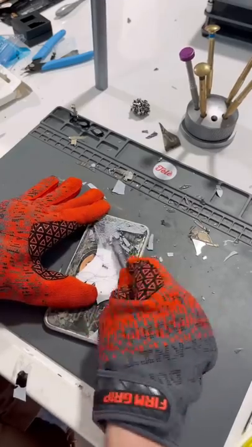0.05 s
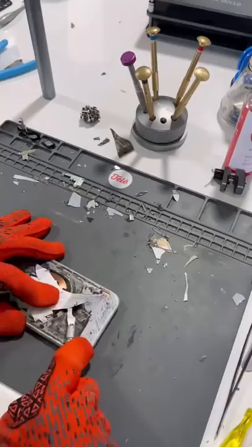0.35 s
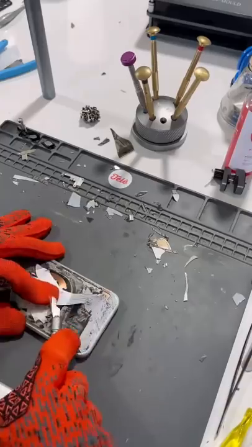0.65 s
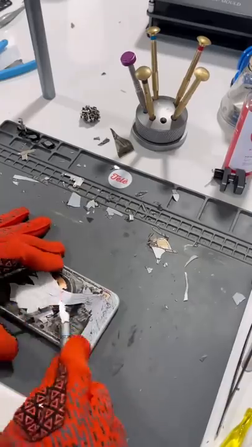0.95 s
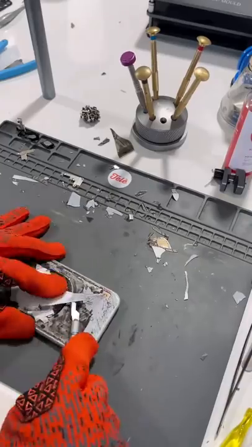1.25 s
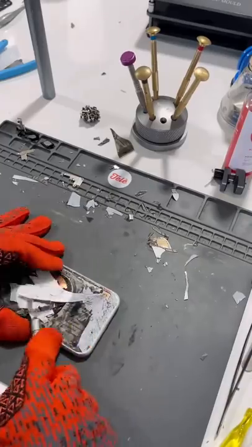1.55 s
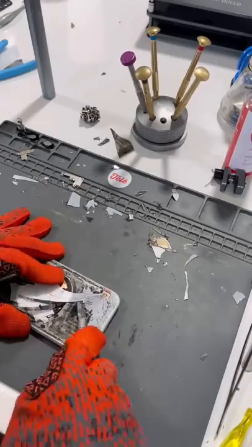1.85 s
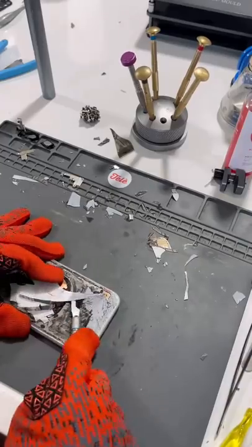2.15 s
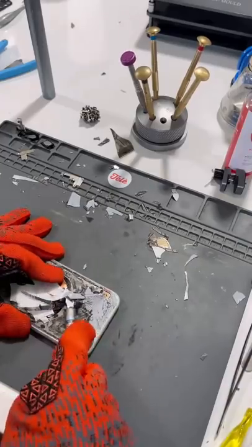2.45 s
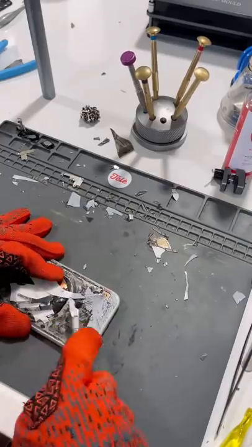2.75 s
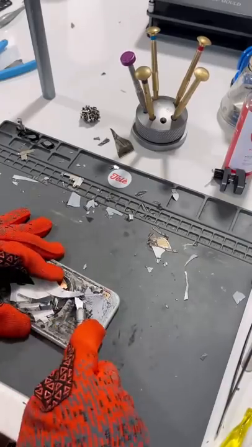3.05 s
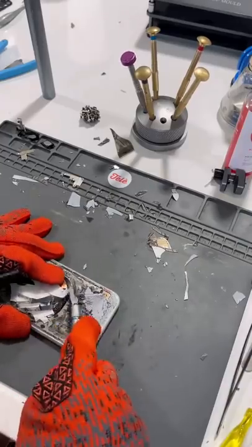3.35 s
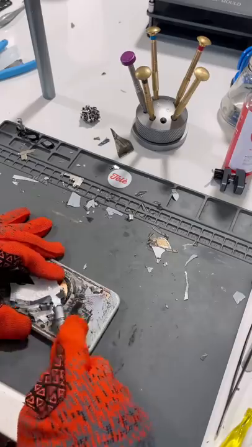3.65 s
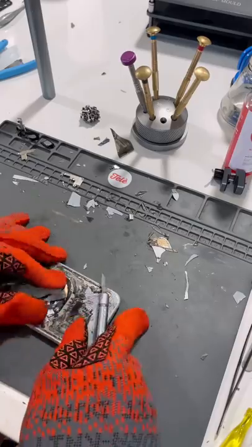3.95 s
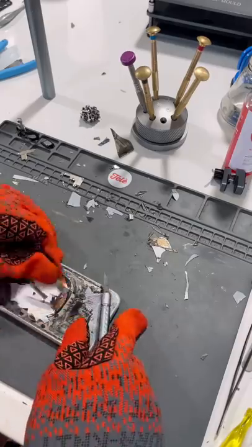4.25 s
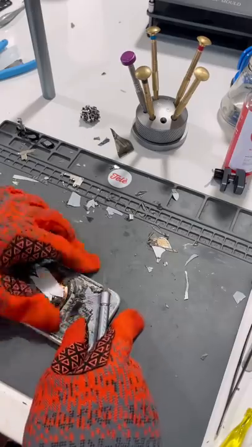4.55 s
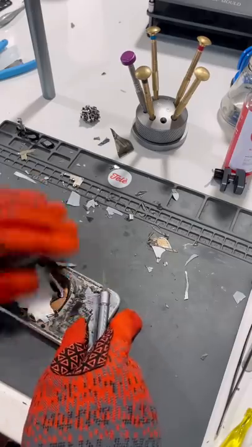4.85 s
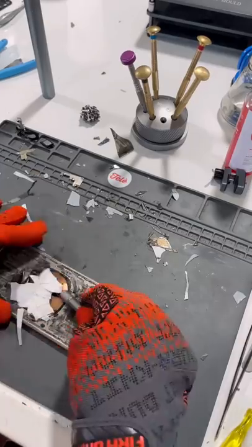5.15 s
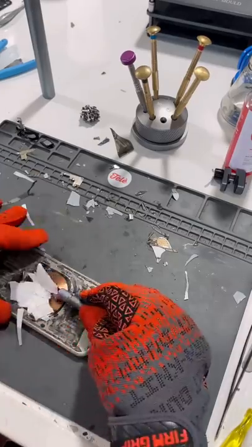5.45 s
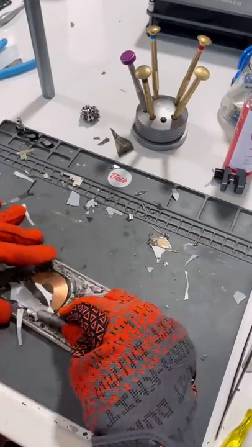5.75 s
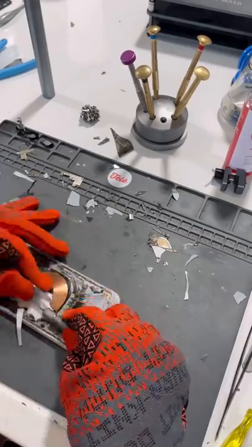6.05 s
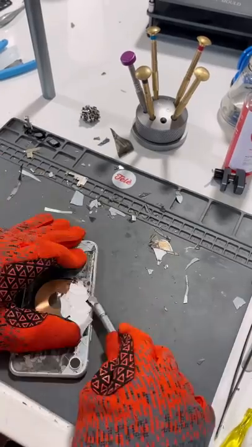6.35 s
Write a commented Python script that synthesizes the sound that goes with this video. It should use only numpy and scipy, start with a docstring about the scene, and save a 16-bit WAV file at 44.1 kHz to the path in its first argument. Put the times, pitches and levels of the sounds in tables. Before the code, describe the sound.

A metal pick chips and scrapes shattered glass off a phone, with sharp irregular snaps, gritty crackling and light knocks over a faint hum.

```python
"""A metal pick chips the shattered back glass off a phone, heard close up on a workbench's rubber mat.
Shards snap with sharp ticks that knock the case and bump the bench; between snaps the steel tip grinds
through glass crumbs and glue, flicks off splinters and squeaks. The small room answers softly and
ventilation hums in it. Two closely spaced microphones listen from above."""
import sys
import numpy as np
from scipy import signal
from scipy.fft import rfft, irfft, next_fast_len
from scipy.io import wavfile

SR = 44100
rng = np.random.default_rng(int(sys.argv[2]) if len(sys.argv) > 2 else 0)


def inscribe(sig):
    """Save sig as 16-bit PCM at rate SR to the path in sys.argv[1].

    A 1-D sig is mono; a 2-D sig holds one channel per row.
    Samples are clipped to [-1, 1] before scaling.
    """
    pcm = np.round(np.clip(np.atleast_2d(sig).T, -1, 1) * 32767)
    wavfile.write(sys.argv[1], SR, pcm.astype(np.int16))


N = 287532

# The colour of a crack, close up. Each row: frequency in Hz, relative level in dB.
CRACK_SPECTRUM = [(900, -36.5), (2100, -78), (3000, -5), (4400, 11.5), (5600, 3), (7200, 9), (9000, 10.5),
                  (11500, 8.5), (15000, 12.5), (16500, -1.5)]
# The phone's case and the bench under it. Each row: pitch in Hz, width in Hz, relative level in dB.
CASE_MODES = [(606, 62, 7.5), (979, 110, 3), (1260, 140, 2.5), (1640, 250, 0.5), (1900, 270, 3.5),
              (2347, 1200, -1.5)]
BENCH_MODES = [(100, 46.2, 0.5), (149, 27.2, 3), (235, 49, -10), (443, 152, -15), (546, 240, -15.5),
               (730, 670, -30.5)]
# Glass snapping just below the microphones. Each row: start in seconds, crack decay in ms, crack level
# in dB, shard level in dB, shard pitch in Hz, knock level in dB, knock pitch in Hz. Levels are relative.
SNAPS = [(0.0483, 2.4, -24.5, -32, 14900, -46, 1960), (0.0709, 0.4, -12.5, -14, 4800, -22.5, 1350),
         (0.0712, 0.3, -30, -15, 8800, -40, 1900), (0.164, 0.87, -50, -43.5, 2800, -43, 1550),
         (0.2362, 3, -31.5, -53, 13800, -47, 1900), (0.27, 0.93, -28, -42, 14000, -47.5, 2800),
         (0.341, 0.24, -36, -39, 14200, -42, 2500), (0.3759, 0.46, -37.5, -37.5, 13700, -54, 666),
         (0.5522, .3, -66, -38, 14800, -49.5, 2600), (0.5925, 0.69, -46.5, -46, 14400, -54, 2110),
         (0.6403, 0.94, -50, -60, 2520, -53, 1820), (1.0845, 1, -54, -55, 4200, -59, 1900),
         (1.1367, 0.25, -43, -59, 2400, -43, 2000), (1.168, 0.6, -56, -69, 2580, -53, 1900),
         (1.1805, 0.6, -56, -65, 3000, -55, 1900), (1.366, 0.8, -43, -55, 2600, -54, 1900),
         (1.2135, 1.4, -40.5, -64, 4990, -46.5, 1900), (1.3008, 0.67, -25, -43, 12600, -45, 2250),
         (1.3044, 0.76, -24, -37, 2650, -41.5, 1990), (1.412, 5.2, -35, -44, 8340, -48, 830),
         (1.4825, 1.3, -34, -40.5, 8100, -59, 1230), (1.497, 0.81, -38, -45, 2400, -80, 2470),
         (1.66, 0.87, -35, -43.5, 2600, -39, 1060), (1.8598, 2.3, -55.5, -52, 2540, -41.5, 1050),
         (1.9001, 1.3, -39, -51, 2560, -43, 1370), (1.9107, 0.37, -32.5, -45, 13900, -40.5, 730),
         (1.9253, 1.15, -12, -30, 14200, -27.5, 1460), (1.9647, 0.77, -24, -43, 10400, -65, 600),
         (1.9703, 1.1, -25, -54, 8800, -66, 2200), (2.0014, 1.5, -17.5, -29, 9600, -29, 1460),
         (2.159, 2.3, -42, -41, 13700, -51.5, 560), (2.1883, 0.66, -18.5, -26.5, 12800, -46, 2800),
         (2.3108, 2.1, -36, -42, 7040, -42, 1730), (2.3787, 0.22, -31, -22.5, 14200, -46, 2270),
         (2.3932, 0.37, -42, -26.5, 7800, -32, 1500), (2.4733, 1.4, -32.5, -56, 2500, -39, 2460),
         (2.6, 1.4, -38.5, -58, 9040, -39.5, 660), (2.7771, 1.7, -29.5, -35, 3820, -31, 1210),
         (2.87, 1.9, -30.5, -30, 12300, -38.5, 1320), (2.8793, 0.46, -31, -72, 2520, -38.5, 1800),
         (2.9315, 0.084, -29, -33.5, 13400, -40, 1630), (3.1733, 0.25, -33.5, -30.5, 8700, -58, 2370),
         (3.2048, 1.2, -30, -23.5, 8770, -42, 1390), (3.247, 0.86, -23.5, -23.5, 8500, -47.5, 1320),
         (3.251, 0.13, -22, -16, 7580, -38.5, 1400), (3.35, 0.92, -45, -31.5, 5930, -53, 2380),
         (3.3664, 0.52, -32.5, -38, 7500, -51, 990), (3.4314, 2, -37, -45.5, 10500, -55.5, 2330),
         (3.47, 2.4, -41, -40, 2280, -39, 876), (3.5105, 3.3, -39, -41, 2380, -35.5, 2600),
         (3.52, 1.7, -33, -60, 2500, -42.5, 2400), (4.0739, 0.54, -41, -45.5, 2920, -40.5, 2560),
         (4.1568, 1.6, -36.5, -59, 2600, -55, 2200), (4.266, 1, -51, -35.5, 2900, -49, 2540),
         (4.276, 0.98, -26, -30.5, 4640, -40.5, 2700), (4.4721, 0.43, -57, -46.5, 2990, -48.5, 2600),
         (4.5269, 4.4, -27, -35, 12600, -43.5, 1890), (4.563, 0.76, -33, -33.5, 2430, -36.5, 1900),
         (4.607, 1.6, -26.5, -36, 11100, -41.5, 2080), (4.6306, 6.8, -22.5, -35, 11900, -42, 2170),
         (4.6617, 8.2, -33, -38, 2620, -42, 2130), (4.6985, 2.6, -38, -52, 15200, -42, 2750),
         (4.882, 0.42, -40, -42.5, 4070, -52, 1480), (4.9449, 3.7, -30.5, -39, 11800, -55, 1350),
         (4.988, 3, -29, -39, 7100, -45.5, 730), (5.157, 0.22, -41, -37.5, 9450, -80, 560),
         (5.1683, 1.7, -34, -43, 3800, -47.5, 2430), (5.2994, 1, -36.5, -49, 10600, -77, 562),
         (5.3121, 1.3, -37.5, -48.5, 2560, -62, 1900), (5.413, 2.3, -74, -50, 2720, -52.5, 2320),
         (5.5346, 1.4, -56, -40, 2500, -40, 1970), (5.5412, 1.2, -16, -22, 10800, -39, 2050),
         (5.5414, 1.7, -28, -32.5, 3600, -60, 2100), (5.9603, 2.4, -44, -44, 13200, -52, 1110),
         (6.0555, 0.9, -34.5, -61, 9040, -67, 1940), (5.7735, 1.14, -45, -58, 2700, -60, 2170),
         (6.2606, 2.4, -45.5, -53.5, 1960, -43.5, 683), (6.3508, 1.8, -51.5, -58, 2420, -63, 551)]


def snaps(shard_width_hz=2400, knock_width_hz=800, clean_ms=.55, crumble=.81, grip_detune=.035):
    """A crack runs through the glass; the freed shard and the tip ring, and case and bench are jolted."""
    glass, case, ms = np.zeros(N), np.zeros(N), np.arange(2048) / SR * 1000
    step = blow(1.0 * (ms == 0))
    for start, decay_ms, crack_db, shard_db, shard_hz, knock_db, knock_hz in SNAPS:
        decay_ms = max(decay_ms, .1)
        # a short snap is nearly one clean step, a long one a run of small breaks
        crack, shard = [step * clean_ms / decay_ms + blow(burst(ms, decay_ms)) for _ in range(2)]
        shard = resonate(resonate(shard, shard_hz, shard_width_hz), shard_hz, 2 * shard_width_hz)
        add(glass, start, from_db(crack_db - 6.5) * blow(colour(crack, CRACK_SPECTRUM)))
        add(glass, start, from_db(shard_db) * blow(shard))
        add(glass, start, from_db(min(crack_db, -31) - 21) * shard_ring(ms / 1000))
        jolt = step + crumble * blow(burst(ms, 1))
        # where the tip bears decides which of the case's modes speak; the changing grip detunes them
        jolt = resonate(resonate(jolt, knock_hz, knock_width_hz), knock_hz, 2 * knock_hz)
        held = [(hz * np.exp(grip_detune * rng.normal()), width, db) for hz, width, db in CASE_MODES]
        add(case, start, from_db(knock_db) * blow(body(jolt, held)))
        # the case rattles on the mat a moment longer; the mat swallows the hardest jolts
        rattle = resonate(burst(ms, 9), hz=770, width=660)
        add(case, start, from_db(min(knock_db, -30) - 9) * blow(body(rattle, BENCH_MODES)))
    tip_ring = from_db(-5) * resonate(glass, hz=15250, width=600)
    return glass + tip_ring + case


def shard_ring(t, low_hz=1200, high_hz=10500, t60=.02, count=9):
    """Every shard has a shape of its own, and so a few thin modes of its own."""
    hz = low_hz * (high_hz / low_hz) ** ((np.arange(count) + rng.random(count)) / count)
    return blow(np.sin(2 * np.pi * hz[:, None] * t).sum(0) * from_db(-60 * t / t60))


# Splinters flicking off the tip, too light to knock the case.
# Each row: start in seconds, pitch in Hz, level in dB.
SPLINTERS = [(0.5657, 14600, -56), (0.6158, 14300, -46), (0.6776, 14100, -55), (1.093, 14800, -52),
             (1.1672, 11600, -45), (1.242, 13000, -49), (1.3266, 13500, -39), (1.4637, 6500, -48),
             (1.675, 7460, -53), (1.782, 8900, -61), (1.9588, 12700, -42), (2.338, 7000, -50),
             (2.436, 14500, -51), (2.5431, 13700, -44), (2.9735, 12400, -39), (3.0806, 13100, -43.5),
             (3.3447, 7350, -46), (3.357, 9500, -46), (3.705, 10000, -60.5), (3.7821, 14600, -52),
             (3.835, 5040, -54), (3.978, 7000, -54), (3.99, 8000, -58), (4.0074, 7900, -51),
             (4.02, 10000, -46), (4.2553, 7200, -40), (4.487, 4300, -47), (4.574, 12700, -35),
             (4.672, 9000, -41), (4.7351, 3000, -46), (4.8305, 14000, -46), (5.142, 3400, -47),
             (5.238, 7200, -48), (5.373, 11030, -51), (5.506, 8350, -46.5), (5.6753, 12700, -41.5),
             (5.6891, 12000, -49.5), (5.7075, 12400, -49), (6.0024, 11700, -37.5), (6.097, 5960, -53.5),
             (6.218, 4424, -56)]


def splinter_ticks(width_hz=3500, decay_ms=1.0):
    """A splinter parts in about a millisecond, at a pitch set by its size."""
    out, ms = np.zeros(N), np.arange(512) / SR * 1000
    for start, hz, db in SPLINTERS:
        add(out, start, from_db(db) * blow(resonate(burst(ms, decay_ms), hz, width_hz)))
    return out


# The tip resting on the glass. Each row: start in seconds, end in seconds.
CONTACT = [(0.0, 1.6), (1.897, 2.2), (2.801, 6.275)]
# That light touch, heard from above: grit, case rumble and fine splinters, each in dB.
LIGHT_TOUCH_DB = [-74.5, -78.5, -82.5]
# Pushes through the crumbs. Each row: hardest moment in seconds, swell time in seconds,
# then the levels of grit, case rumble and fine splinters in dB.
PUSHES = [(0.091, 0.028, -63.5, -53, -48), (0.27, 0.019, -55.5, -55, -60), (0.375, 0.047, -58.5, -62, -51),
          (0.501, 0.098, -57, -68, -55), (0.706, 0.073, -59, -64, -54.5),
          (0.811, 0.071, -59.5, -75.5, -63.5), (0.98, 0.034, -72, -100, -58.5),
          (1.3, 0.083, -52, -55, -47.5), (1.476, 0.091, -58, -66.5, -62.5),
          (1.664, 0.0065, -50.5, -57, -80), (2.048, 0.093, -52.5, -55, -48.5),
          (2.197, 0.021, -56, -57, -48.5), (2.317, 0.027, -51.5, -63, -53), (2.392, 0.017, -47, -73, -37.5),
          (2.465, 0.069, -55.5, -81, -44), (2.589, 0.33, -63.5, -64, -68.5),
          (2.796, 0.016, -57, -65.5, -74), (2.883, 0.041, -50, -51, -67), (2.95, .03, -62.5, -73, -54.5),
          (3.004, 0.017, -59.5, -75, -83), (3.079, 0.027, -58, -57, -53), (3.255, .012, -66, -76, -46),
          (3.35, 0.027, -50.5, -60, -49.5), (3.552, 0.014, -52, -56, -63.5), (3.781, 0.12, -63, -70, -66.5),
          (4.013, 0.095, -51.5, -56, -53.5), (4.162, 0.048, -52, -58, -57.5), (4.226, 0.094, -50, -61, -52),
          (4.264, 0.027, -38.5, -50, -44), (4.554, 0.05, -42.5, -54, -47.5), (4.65, 0.062, -40.5, -52, -47),
          (4.743, 0.035, -72, -60, -64), (4.865, 0.072, -63, -61, -56), (4.976, 0.14, -45, -55.5, -62.5),
          (5.147, 0.033, -55.5, -65, -71), (5.244, 0.025, -59, -70, -59), (5.536, 0.005, -43, -72, -45.5),
          (5.994, 0.034, -57.5, -66, -51), (6.058, 0.028, -56.5, -63, -60.5),
          (6.215, 0.058, -63.5, -65.5, -83)]


def pressure(swell_db=19, roundness=.86):
    """Levels of grit, rumble and splinters: each push swells and lets go, over the resting touch."""
    t = np.arange(0, N, 40) / SR
    resting = sum((t >= start) & (t < end) for start, end in CONTACT)
    power = resting * from_db(LIGHT_TOUCH_DB)[:, None] ** 2
    for peak, swell_s, *levels_db in PUSHES:
        release_s = .049 + .11 * swell_s  # a slow push also lets go slowly
        away = np.maximum((peak - t) / swell_s, (t - peak) / release_s)
        power += from_db(np.array(levels_db)[:, None] - swell_db * away ** roundness) ** 2
    return [np.interp(np.arange(N) / SR, t, np.sqrt(layer)) for layer in power]


# Grit and fine splinters at close range. Each row: frequency in Hz, relative level in dB.
GRIT_SPECTRUM = [(1200, -11), (2200, 4), (3400, 6.5), (5000, 6), (7500, 7.5), (9300, 8), (11000, 6),
                 (13000, 1.5)]
SPLINTER_SPECTRUM = [(8000, -51.5), (11000, 4.5), (12500, 14.5), (14300, 14), (15400, 0.5), (16400, -16.5)]


def scrape(heavy_db=-55, burst_s=.0011, steady_grind=.55, wander_db=6.5, mat_limit_db=-56.5):
    """The tip crushes crumbs in uneven clumps; the same slips shake bench, case, grit and splinters."""
    grit, rumble, fine = pressure()
    # a light touch catches on single edges; a heavy one crushes evenly
    catches = from_db(8.5) * slips(per_s=80, spread_db=2) / (1 + (grit + fine) / from_db(heavy_db))
    # crumbs give way in short bursts over a steady grind
    breaks = np.abs(slips(per_s=520, spread_db=1.6))
    grind = steady_grind + signal.lfilter([1], [1, -np.exp(-1 / (burst_s * SR))], breaks + 1e-18)
    shared = slips(per_s=7000)
    on_case, on_grit, on_fine = [catches + grind * (shared + .98 * slips(per_s=8000)) for _ in range(3)]
    # as the tip moves over the case its modes come and go
    push = resonate(on_case, hz=2300, width=2200)
    case = sum(from_db(db + wander_db * drift(24)) * resonate(push, hz, width)
               for hz, width, db in CASE_MODES)
    bench = from_db(-1.5) * rms_one(body(resonate(on_case, hz=470, width=520), BENCH_MODES))
    crunch = grit * rms_one(colour(rms_one(on_grit) + crumbs(on_fine), GRIT_SPECTRUM))
    sizzle = fine * rms_one(colour(on_fine, SPLINTER_SPECTRUM))
    return crunch + sizzle + rumble * rms_one(case) + np.minimum(rumble, from_db(mat_limit_db)) * bench


def slips(per_s, spread_db=.5):
    """Tiny stick-slip clicks, most weak and a few stronger."""
    sizes = from_db(spread_db * np.minimum(rng.exponential(1, N), 4.5)) * rng.choice([-1, 1], N)
    return sizes * (rng.random(N) < per_s / SR)


def crumbs(force, width_hz=750, count=14):
    """Each slip breaks a crumb of its own size, which rings at its own pitch."""
    size, pitches_hz = rng.integers(0, count, N), np.linspace(2000, 12000, count)
    return rms_one(sum(resonate(force * (size == k), hz, width_hz) for k, hz in enumerate(pitches_hz)))


# Short, gritty rubs across the case. Each row: start in seconds, length in seconds, pitch in Hz,
# level in dB.
SQUEAKS = [(0.411, 0.05, 1050, -67.5), (0.453, 0.032, 1120, -63.5), (0.489, 0.037, 2660, -65),
           (0.677, 0.045, 2170, -66), (2.891, 0.062, 1900, -64), (2.999, 0.026, 1430, -61.5),
           (3.056, 0.01, 2170, -69), (3.074, 0.028, 1530, -62), (3.11, 0.017, 1900, -69),
           (3.936, 0.015, 1840, -58.5), (4.518, 0.064, 1800, -55), (5.049, 0.029, 2110, -59.5),
           (5.17, 0.021, 1830, -62.5), (5.213, 0.012, 1780, -68), (5.232, 0.031, 1760, -62.5),
           (5.302, 0.015, 1900, -59.5), (5.95, 0.03, 2050, -72), (5.986, 0.01, 1900, -66),
           (6.043, 0.028, 1680, -72), (6.502, 0.023, 1985, -66)]


def squeaks(slips_per_s=280, uneven=.35, slip_ms=.96, width_hz=190, pitch_scatter=.06):
    """The pick sticks and slips; each slip is a tiny scratch that rings the case at a pitch of its own."""
    out, ms = np.zeros(N), np.arange(512) / SR * 1000
    for start, length, hz, db in SQUEAKS:
        gaps, wander = rng.standard_normal((2, 64))
        times = np.cumsum(np.exp(uneven * gaps)) / slips_per_s
        pitches = hz * np.exp(pitch_scatter * wander)
        scratches = [burst(ms, slip_ms) for _ in times]
        rub = np.zeros(int(length * SR) + len(ms))
        for at, pitch, scratch in zip(times[times < length], pitches, scratches):
            modes = [(pitch, width_hz, 0), (2.3 * pitch, 2 * width_hz, -13)]
            swell = np.sqrt(np.sin(np.pi * at / length))
            add(rub, at, swell * blow(body(resonate(scratch, pitch, pitch), modes)))
        add(out, start, from_db(db) * rms_one(rub))
    return out


# Notes ringing on after the pick. Each row: start in seconds, pitch in Hz, peak level in dB,
# time to fall 60 dB in seconds.
RINGS = [(0.0712, 1585, -18, 0.033), (0.0712, 1198, -21, 0.013), (1.0545, 4780, -42.5, 0.022),
         (2.003, 625, -40, 0.055), (1.055, 9100, -45.5, 0.023), (1.482, 9160, -40, 0.017),
         (2.557, 1007, -49.5, 0.05), (2.6001, 9500, -35, 0.007), (2.63, 9060, -35, 0.0077),
         (2.778, 1150, -29, 0.013), (2.7785, 1370, -31, 0.013), (3.473, 995, -43, 0.03),
         (4.288, 15250, -44, 0.065), (4.5, 15200, -50, .1), (4.699, 15250, -43, .12),
         (5.541, 2250, -32, 0.012), (5.541, 1750, -36, 0.012)]


def rings():
    """The phone's frame, loose pieces and the steel tip sound short, clear notes."""
    out, t = np.zeros(N), np.arange(SR // 5) / SR
    for start, hz, db, t60 in RINGS:
        add(out, start, from_db(db - 60 * t / t60) * np.sin(2 * np.pi * hz * t))
    return out


# The reverberant tail after a bump. Each row: pitch in Hz, width in Hz, relative level in dB.
TAIL_MODES = [(440, 220, 4), (780, 830, -7), (1280, 200, -4)]
# Bumps down on the bench top. Each row: start in seconds, bump level in dB, tail level in dB.
BUMPS = [(0.072, -24, -50.5), (1.662, -52, -60), (1.928, -44, -55.5), (2.003, -45, -53), (2.6, -38.5, -60),
         (2.778, -44, -53.5), (2.87, -39.5, -55), (3.472, -57, -57), (3.512, -39, -65), (5.542, -45, -75),
         (6.26, -39.5, -61)]


def bumps(settle_s=.005, thud_hz=150, tail_t60=.34, grains_per_s=900):
    """The phone settles on the mat and the bench booms; a rough low-mid reverberant tail dies away."""
    out, t = np.zeros(N), np.arange(SR // 4) / SR
    for start, bump_db, tail_db in BUMPS:
        push = resonate(rng.standard_normal(len(t)) * t * np.exp(-t / settle_s), thud_hz, 2 * thud_hz)
        grains = rng.standard_normal(len(t)) * (rng.random(len(t)) < grains_per_s / SR)
        tail = rms_one(body(grains, TAIL_MODES))
        add(out, start, from_db(bump_db) * blow(body(push, BENCH_MODES)))
        add(out, start, from_db(tail_db - 60 * t / tail_t60) * tail)
    return out


# The small room, heard from the bench. Each row: frequency in Hz, gain in dB.
ROOM_COLOUR = [(100, -11.5), (300, -4), (520, -1.5), (1500, -12), (3000, -14.5), (6000, -16.5),
               (10000, -18), (13000, -22.5), (16000, -33.5)]


def room(x, t60=.42, build_s=.00087):
    """The room answers with a diffuse tail that builds up in a few milliseconds."""
    t = np.arange(int(.7 * SR)) / SR
    tail = rng.standard_normal((2, len(t))) * from_db(-60 * t / t60) * (1 - np.exp(-t / build_s))
    tail = colour(tail / np.sqrt(np.sum(tail ** 2) / 2), ROOM_COLOUR)
    return spread_out(*signal.fftconvolve(x[None], tail, axes=1)[:, :N])


# Ventilation hum in the background. Each row: pitch in Hz, width in Hz, level in dB.
HUM_LINES = [(78.97, 3.3, -58.5), (103.05, 1.6, -59.5), (160.3, 6.1, -64), (190.6, 2.3, -67.5),
             (279.5, 3.9, -77.5), (381.1, 10, -71.5), (2350, 50, -83)]
# Air noise all around the microphones. Each row: frequency in Hz, relative level in dB.
AIR_SPECTRUM = [(20, -33.5), (35, -30), (55, -2), (80, 7), (125, -6), (170, -7), (300, -14), (450, -17.5),
                (620, -29), (950, -28.5), (1400, -29), (2500, -36.5), (3300, -31), (3900, -36),
                (10000, -46), (16000, -47)]


def ventilation(air_db=-57.5):
    """The ventilation sounds wavering hum lines over soft air noise."""
    hum = sum(from_db(db) * rms_one(resonate(rng.standard_normal(N + SR), hz, width)[SR:])
              for hz, width, db in HUM_LINES)
    air = rms_one(colour(rng.standard_normal((2, N + SR)), AIR_SPECTRUM)[:, SR:])
    return hum + spread_out(*from_db(air_db) * air)


def spread_out(mid, side, apart_hz=600, alike_hz=7000):
    """Diffuse sound is alike at both microphones in the bass and differs most in the middle range."""
    side = signal.sosfilt(signal.butter(1, [apart_hz, alike_hz], "band", fs=SR, output="sos"), side)
    return np.array([mid + side, mid - side])


def from_db(db):
    return 10 ** (np.asarray(db) / 20)


def rms_one(x):
    return x / np.sqrt(np.mean(x ** 2) + 1e-20)


def blow(x):
    """Scales a short sound to the energy of one millisecond at full level."""
    return x * np.sqrt(SR / 1000 / (np.sum(x ** 2) + 1e-20))


def burst(ms, decay_ms):
    """Noise that starts at once and dies away."""
    return rng.standard_normal(len(ms)) * np.exp(-ms / decay_ms)


def drift(turns_per_s):
    """A smooth random wander with a spread near 1."""
    return np.interp(np.arange(N) / SR * turns_per_s, np.arange(4000), rng.standard_normal(4000))


def add(out, start, x):
    """Mixes a short sound in at a start time in seconds."""
    at = max(round(start * SR), 0)
    out[at:at + len(x)] += x[:max(len(out) - at, 0)]


def colour(x, points):
    """Causal (minimum-phase) filter that follows a short spectrum."""
    size = 2 * next_fast_len(x.shape[-1] // 2 + 2048)
    hz, db = np.transpose(points)
    gain = from_db(np.interp(np.log(np.arange(size // 2 + 1) * SR / size + 1), np.log(hz), db))
    cepstrum = irfft(np.log(gain)) * np.r_[1, np.full(size // 2 - 1, 2), 1, np.zeros(size // 2 - 1)]
    return irfft(rfft(x, size) * np.exp(rfft(cepstrum)))[..., :x.shape[-1]]


def resonate(x, hz, width):
    """One resonance with gain 1 at its top and a width in Hz."""
    r = np.exp(-np.pi * width / SR)
    feedback = [1, -2 * r * np.cos(2 * np.pi * hz / SR), r * r]
    return signal.lfilter(np.array([1, 0, -1]) * (1 - r * r) / 2, feedback, x + 1e-18)


def body(x, modes):
    """Resonances side by side, with alternating signs."""
    return sum((-1) ** k * from_db(db) * resonate(x, hz, width) for k, (hz, width, db) in enumerate(modes))


def scene():
    """Glass and case sound close by, with the room and its ventilation around them."""
    work = snaps() + splinter_ticks() + scrape() + squeaks() + bumps() + rings()
    return work + room(work) + ventilation()


# The microphone pair above the bench. Each row: frequency in Hz, phase lead of the left port in radians.
PORT_PHASE = [(500, 0), (1100, -.7), (1900, 0), (3200, 0), (3900, 1.2), (5000, 1.2), (6000, .35),
              (6800, 1.2), (8500, 5.3), (9500, 6.3), (10800, 7.1), (13200, 8.8), (16500, 8.9)]
# The pair's balance. Each row: frequency in Hz, left minus right level in dB.
PORT_BALANCE = [(200, .5), (700, 3.3), (1300, 1.2), (2400, -.3), (4400, 0), (6500, -1.8), (7600, -3.5),
                (8800, 0)]


def ports(x):
    """The two microphone ports differ in phase and level, each pitch in its own way."""
    size = next_fast_len(N + 2048)
    hz = np.arange(size // 2 + 1) * SR / size
    lead = np.interp(hz, *np.transpose(PORT_PHASE))
    lean = from_db(np.interp(hz, *np.transpose(PORT_BALANCE)) / 2)
    return irfft(rfft(x, size) * np.array([lean, np.exp(-1j * lead) / lean]), size)[:, :N]


# Brief dips in both channels. Each row: time in seconds, recovery in seconds, nominal depth in dB.
DIPS = [(0.296, 0.0039, -29), (5.013, 0.026, -21), (6.277, 0.021, -15)]


def record(dry, ceiling=.7, dip_onset_s=.004, cutoff_hz=16950):
    """Two ports hear the bench; peaks are rounded; the level dips briefly three times; the top is cut."""
    t = np.arange(N) / SR
    rounded = ceiling * np.tanh(ports(dry) / ceiling)
    dip_db = sum(db * np.clip((t - at) / dip_onset_s + .5, 0, 1) * np.exp(-((t - at) / recovery) ** 2)
                 for at, recovery, db in DIPS)
    lowpass = signal.ellip(10, .2, 80, cutoff_hz, fs=SR, output="sos")
    return signal.sosfilt(lowpass, rounded * from_db(dip_db))


dry = scene()
out = record(dry)
inscribe(out)
```